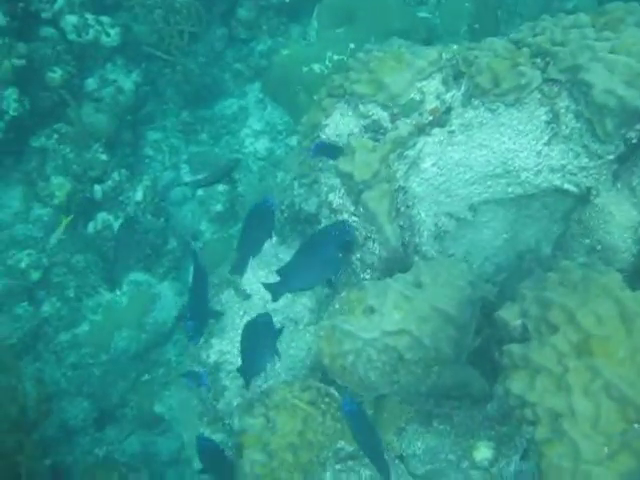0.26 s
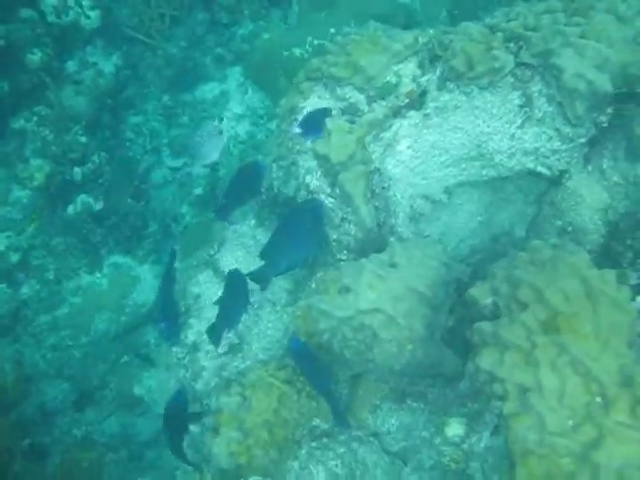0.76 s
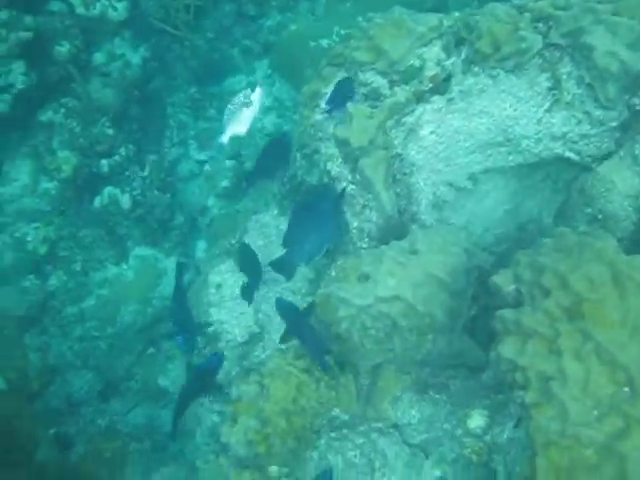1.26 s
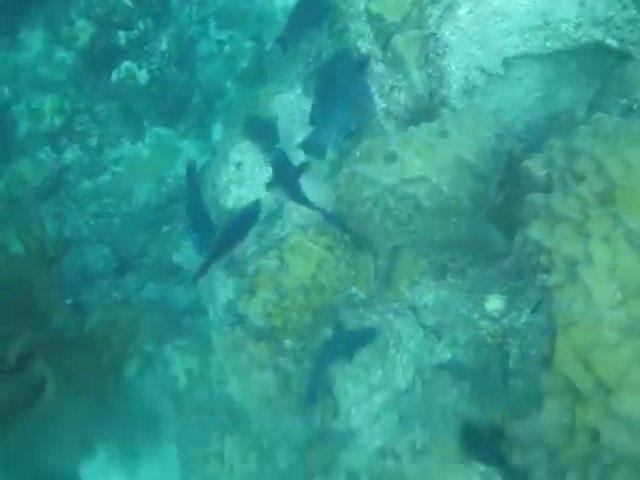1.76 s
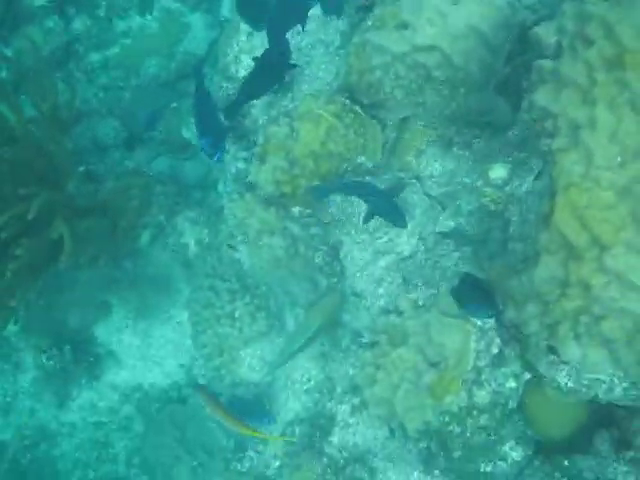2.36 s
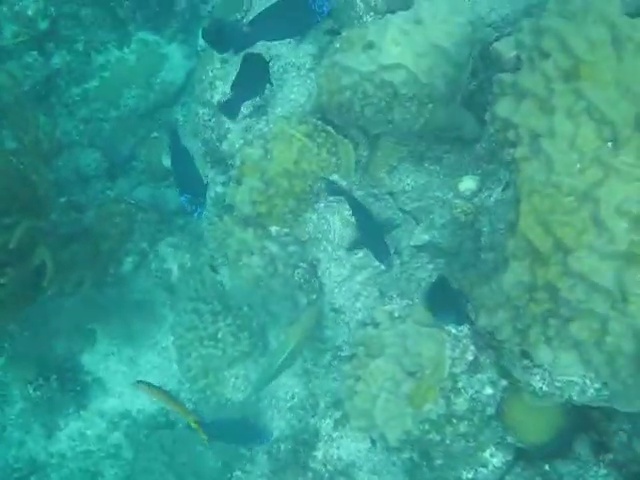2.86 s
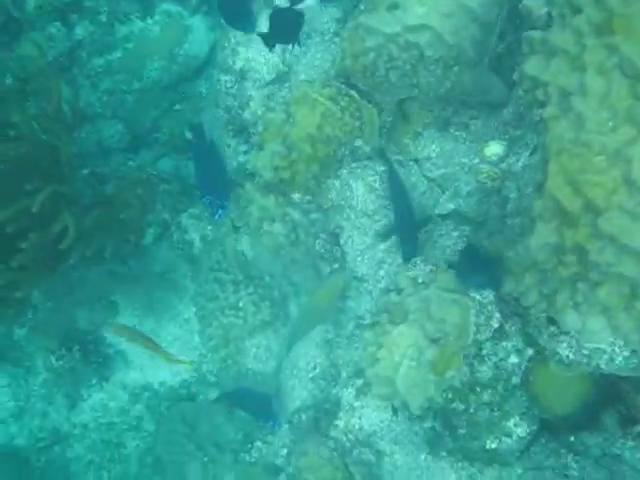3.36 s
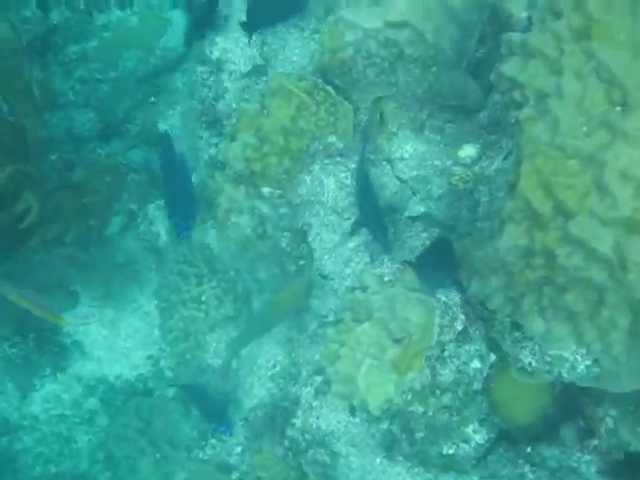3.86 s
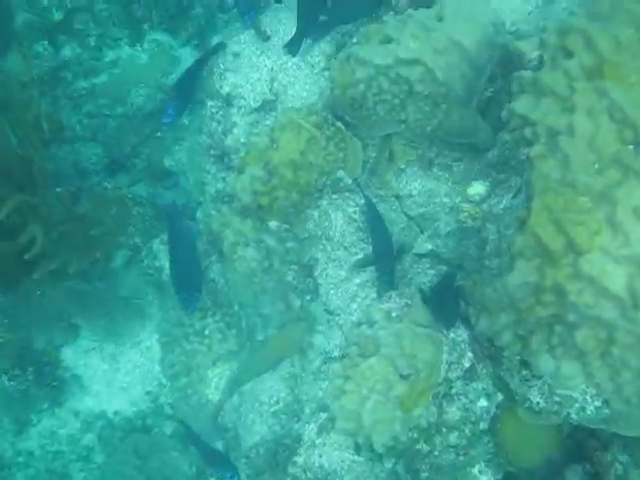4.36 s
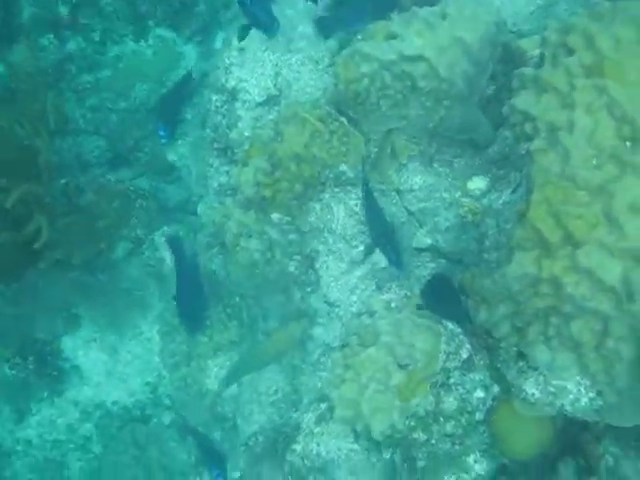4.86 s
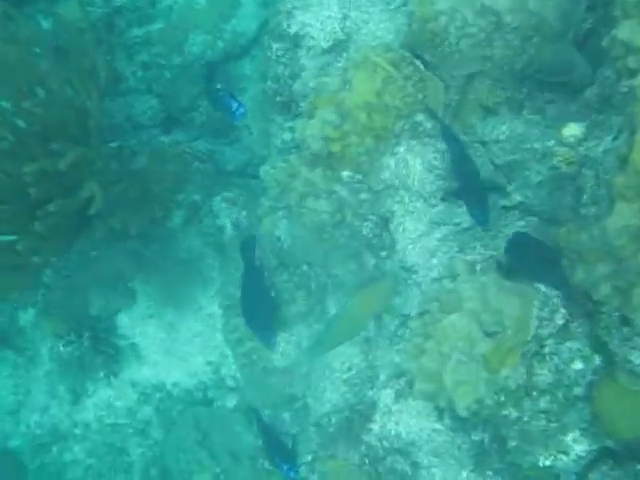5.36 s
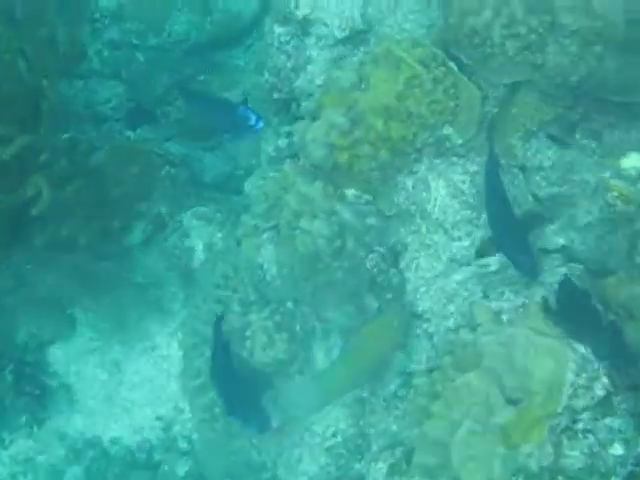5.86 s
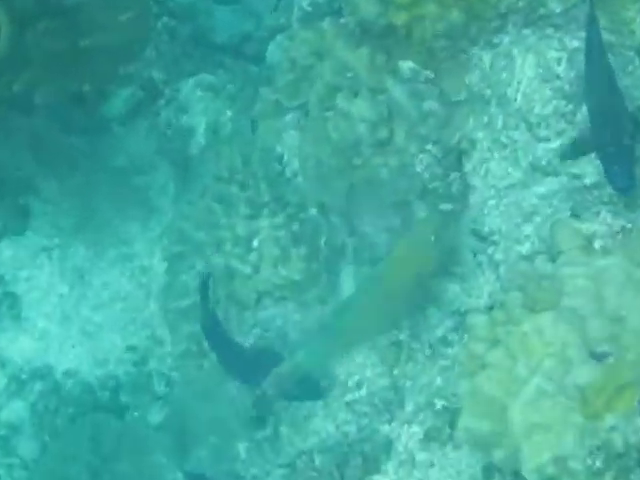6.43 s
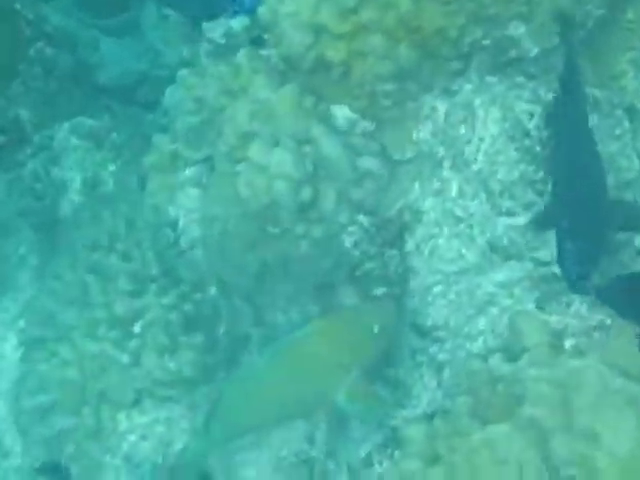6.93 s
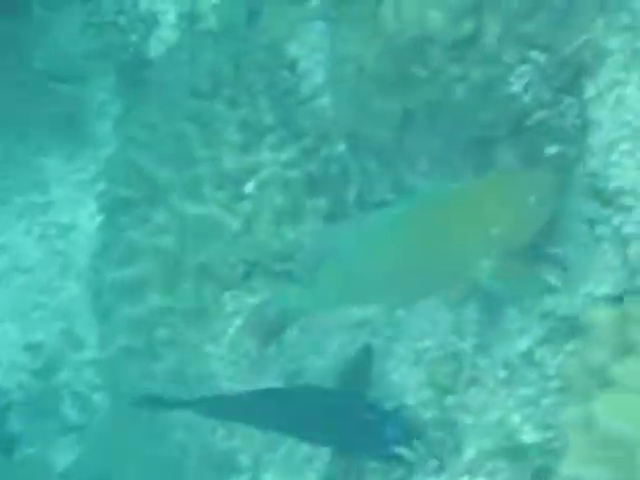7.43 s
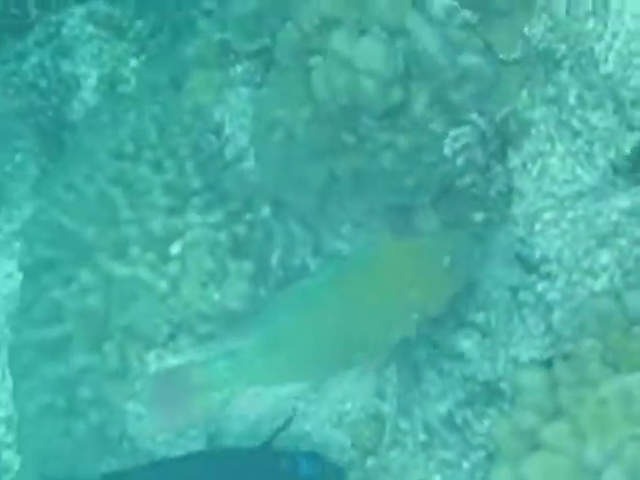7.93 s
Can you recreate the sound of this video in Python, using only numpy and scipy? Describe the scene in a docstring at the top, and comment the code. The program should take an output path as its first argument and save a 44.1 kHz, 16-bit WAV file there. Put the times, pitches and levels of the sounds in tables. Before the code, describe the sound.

A coral reef heard from inside a watertight camera case, slightly hollow and boxy. Throughout, thousands of distant shrimp snaps form a quiet frying hiss with finer crackle, over a low, gently swaying wash and faint bubbles. From the start, nearer snaps tick irregularly, with stronger ones at about 0.7, 1.5 and 3.3 seconds. Grazing fish add very short, dry rasps, notably near 1.7, 3.45 and 5.7. Around 4.4 to 4.9 water swishes and small bubbles fizz; from 4.8 to 5.3 deep, round glugs tumble quickly over a low gurgle, with a strong snap at their onset. Then the crackle, clicks and scrapes carry on. At 7.2 a brief rush of noise leads into one very loud, hard, bright crack with a soft thump at 7.26. The background ducks and recovers within a fraction of a second; a sharp snap follows at 7.7 and a small bubble near 8.2.

```python
"""A frying hiss and crackle of distant shrimp over a low wash: a coral reef inside a diver's camera case.
Near snaps are noise bursts and rasping fish are stick-slip noise, both ringing the watertight case.
Air glugs and fizzes as swelling sines; noise swells as water swishes and briefly leads into a crack.
That one very close crack, made of ringing modes, a thump and a burst, makes the gain control duck."""
import sys
import numpy as np
from scipy import signal
from scipy.fft import rfft, irfft
from scipy.io import wavfile
from scipy.ndimage import uniform_filter1d

SR = 44100
rng = np.random.default_rng(int(sys.argv[2]) if len(sys.argv) > 2 else 0)


def unload_wav(signal):
    """Save mono or channel-first audio to the path in sys.argv[1] as 16-bit WAV at rate SR, clipped to [-1, 1]."""
    wavfile.write(
        sys.argv[1],
        SR,
        np.round(np.clip(np.atleast_2d(signal).T, -1, 1) * 32767).astype(np.int16),
    )


N = 361179
TIME = np.arange(N) / SR


def amp(db):
    """Decibels to gain."""
    return 10 ** (np.asarray(db) / 20)


def evened(x):
    """Scales to rms 1."""
    return x / np.sqrt(np.mean(x ** 2) + 1e-20)


def read(points, hz):
    """Interpolates (Hz, dB) points on a log-frequency axis."""
    f, value = np.transpose(points)
    return np.interp(np.log(hz + 1), np.log(f + 1), value)


def add(mix, start_s, sound):
    """Mixes a sound in at start_s."""
    part = mix[max(round(start_s * SR), 0):][:len(sound)]
    part += sound[:len(part)]


def coloured(x, spectrum):
    """Filters by a spectrum of (Hz, dB) points."""
    hz = np.fft.rfftfreq(len(x), 1 / SR)
    return irfft(rfft(x) * amp(read(spectrum, hz)), len(x))


def causal(log_gain):
    """Causal (minimum-phase) spectrum with this log gain around the full frequency circle."""
    return np.exp(np.conj(signal.hilbert(log_gain)))


def swells(rows, attack_s, release_s):
    """Gain over time of events that rise, hold and fall."""
    gain = np.zeros(N)
    for start_s, length_s, db in rows:
        rise = (TIME - start_s) / attack_s
        fall = (start_s + length_s - TIME) / release_s
        gain += amp(db) * np.clip(np.minimum(rise, fall), 0, 1)
    return gain


# Resonances of the camera case. Each row: centre in Hz, half-power width in Hz, relative level in dB.
CASE_MODES = [(453, 285, 3.5), (876, 460, -7.5), (1412, 206, -3), (2040, 276, -1), (2780, 110, -20),
              (3276, 320, -2), (3630, 300, -7), (4940, 290, -6), (5470, 360, -9), (5847, 190, -5.5),
              (7340, 440, -14.5), (8050, 234, -4.5), (8730, 260, -8), (9180, 360, -9), (10000, 290, -10),
              (10830, 530, -7), (11380, 550, -11), (11970, 400, -11), (13500, 690, -14), (14800, 1200, -14)]


def case_response(leak_db, leak_edge_hz=11500, size=1024):
    """Impulse response of the case: its resonances over a direct leak."""
    hz = abs(np.fft.fftfreq(size, 1 / SR))
    power = amp(leak_db) ** 2 / (1 + (hz / leak_edge_hz) ** 2) ** 2
    for centre_hz, width_hz, db in CASE_MODES:
        power = power + amp(db) ** 2 * 0.5 ** ((2 * (hz - centre_hz) / width_hz) ** 2)
    return np.fft.ifft(causal(np.log(power) / 2)).real


def through_case(force, case, colour_db, db, level_s):
    """Rings the case with a coloured force; total energy equals rms level db held for level_s."""
    hz = np.maximum(abs(np.fft.fftfreq(len(case), 1 / SR)), SR / len(case))
    path = np.fft.ifft(causal(np.log(amp(colour_db(hz)))) * np.fft.fft(case)).real
    rung = signal.fftconvolve(force, path)
    return amp(db) * evened(rung) * np.sqrt(level_s * SR / len(rung))


def collapse(decay_s, echo_db, echo_decay_s, size=900):
    """A cavity collapses: a burst of about a millisecond, then scatter from the rock around."""
    t = np.arange(size) / SR
    burst = np.exp(-(t / decay_s) ** 2)
    scatter = amp(echo_db) * np.exp(-t / echo_decay_s)
    return rng.standard_normal(size) * (burst + scatter)


def bubble(start_hz, swell_s, rise_per_s):
    """A pocket of air swells into ringing and dies away, its pitch rising slightly."""
    t = np.arange(SR // 8) / SR
    age = t / swell_s
    return age * np.exp(1 - age) * np.sin(2 * np.pi * start_hz * t * (1 + rise_per_s * t))


def trickle(low_hz, high_hz, per_s, cycles, count=16):
    """A random stream of bubbles of many sizes; each swells over a set number of cycles."""
    out = np.zeros(N)
    for hz in np.geomspace(low_hz, high_hz, count):
        births = rng.standard_normal(N) * (rng.random(N) < per_s / count / SR)
        out += signal.oaconvolve(births, bubble(hz, cycles / hz, rise_per_s=1))[:N]
    return evened(out)


# Colour of the far crackle, apart from the case. Each row: frequency in Hz, relative level in dB.
FAR_COLOUR = [(300, -6), (1400, 2.5), (2100, -3.5), (2750, 1.5), (3300, -7), (5500, -9), (9000, -7.5),
              (16000, -14.5)]


def far_reef(case, per_s=3000, rms_db=-56):
    """Thousands of distant snaps merge into a frying hiss."""
    clicks = rng.standard_normal(N) * (rng.random(N) < per_s / SR)
    rung = signal.oaconvolve(clicks, case)[:N]
    return amp(rms_db) * evened(coloured(rung, FAR_COLOUR))


# Colour of the nearer crackle before the case. Each row: frequency in Hz, relative level in dB.
NEARER_COLOUR = [(300, -8.5), (1400, -11.5), (2100, -1), (3300, 0), (5300, 1), (8000, 3.5), (11000, 1),
                 (15000, 4)]


def crackle(case, spread_db=3.5, cap_db=15, rms_db=-59.5, tint_db=6, count=1300):
    """Shrimp farther off: random snaps, mostly faint, each tinted by its own path through the rock."""
    out = np.zeros(N)
    hz = abs(np.fft.fftfreq(len(case), 1 / SR))
    knots_hz = np.linspace(0, SR / 2, num=14)
    draws = rng.standard_normal((count, len(knots_hz)))
    tints = np.array([np.interp(hz, knots_hz, row) for row in draws])
    log_gain = np.log(amp(read(NEARER_COLOUR, hz) + tint_db * tints))
    paths = causal(log_gain) * np.fft.fft(case)  # causal: the attack stays sharp
    sizes_db = np.minimum(spread_db * rng.exponential(1, count), cap_db)
    starts_s = rng.random(count) * N / SR
    for start_s, size_db, path in zip(starts_s, sizes_db, paths):
        force = collapse(decay_s=0.00048, echo_db=-1.0, echo_decay_s=0.0036, size=len(case))
        rung = np.fft.ifft(np.fft.fft(force) * path).real
        add(out, start_s, amp(size_db) * evened(rung))
    return amp(rms_db) * evened(out)


# Spectrum of the low wash. Each row: frequency in Hz, relative density in dB per Hz.
WASH_COLOUR = [(15, -13), (25, 1.5), (50, 0.5), (150, 0.5), (280, -2), (450, -11.5), (700, -13.5),
               (1400, -14), (2600, -16.5), (6500, -25.5), (16000, -32.5)]


def water(level_db=-55, sway_rms_db=0.57):
    """Low wash of water around the case, swaying slowly."""
    waves = [np.sin(2 * np.pi * (f * TIME + rng.random())) / np.sqrt(f)
             for f in np.geomspace(0.3, 6, num=12)]
    sway = evened(sum(waves))
    wash = evened(coloured(rng.standard_normal(N), WASH_COLOUR))
    return amp(level_db + sway_rms_db * sway) * wash


def burble(rms_db=-67.5):
    """Faint bubbles all along, born at random over two octaves."""
    return amp(rms_db) * trickle(low_hz=137.6, high_hz=547, per_s=55, cycles=1.24)


# Colour all near snaps share before the case. Each row: frequency in Hz, relative level in dB.
SNAP_COLOUR = [(460, 0.5), (1100, -4.5), (2100, -0.7), (2650, 3), (3400, 1), (4200, 2.7), (5300, -2),
               (6600, -5.5), (7900, -2.5), (11000, 1.8), (14200, 5)]
# Near shrimp snaps. Each row: start in seconds, level in dB (rms over 10 ms), pitch in Hz, spread in octaves.
NEAR_SNAPS = [(0.1313, -43, 5650, 0.66), (0.181, -46.5, 6030, 0.48), (0.273, -47.5, 3850.0, 1.1),
              (0.317, -49.3, 9070.0, 0.9), (0.4427, -47.5, 5500, 0.58), (0.5202, -45, 4970, 0.9),
              (0.621, -49.5, 2610.0, 1.2), (0.7025, -35.5, 6570, 0.39), (1.0653, -43.5, 3520.0, 1.5),
              (1.3508, -41.5, 3570, 1.3), (1.5244, -37.5, 6720.0, 0.41), (1.862, -43, 3750, 0.89),
              (2.3449, -47.5, 4160.0, 1.8), (2.446, -46.5, 4400, 1.1), (2.5003, -48, 11580.0, 0.49),
              (2.559, -48.8, 5600, 0.34), (2.713, -40.5, 4970, 1.31), (2.8305, -46.5, 7250.0, 1.2),
              (2.8688, -43, 10250.0, 1.3), (2.9773, -45, 7490.0, 0.4), (3.122, -48.9, 3100.0, 0.55),
              (3.1525, -48, 3540.0, 1.3), (3.2814, -38.7, 6900.0, 0.42), (3.34, -46.2, 4520.0, 1.8),
              (3.3756, -47.0, 4950.0, 1.7), (3.4147, -42, 8000.0, 1.1), (3.5903, -43, 3000, 0.39),
              (3.61, -50.5, 4890.0, 1.13), (3.8768, -40, 8800, 0.61), (3.9756, -51, 5570, 0.18),
              (4.0828, -50, 5860, 0.91), (4.22, -40, 5010.0, 2.4), (4.2589, -42, 3340.0, 0.45),
              (4.3637, -48, 7280.0, 0.7), (4.52, -45, 5060.0, 1.1), (4.54, -46, 3030.0, 1.27),
              (4.6879, -45.5, 5390.0, 0.84), (4.8183, -33.5, 1720, 1.54), (4.8423, -44.2, 2560.0, 0.89),
              (4.9398, -46, 1960, 2.4), (5.183, -52, 7300, 0.22), (5.2538, -45, 1000.0, 2.4),
              (5.307, -43.5, 4200.0, 0.75), (5.4663, -41, 7200, 0.63), (5.6398, -50.5, 5330.0, 1.02),
              (5.7059, -45.5, 1840.0, 3.0), (6.1068, -44, 9000, 0.39), (6.179, -38.5, 6860, 0.93),
              (6.5293, -46.3, 5940.0, 0.4), (6.5432, -47, 4720.0, 0.74), (6.6706, -45, 5480.0, 3.3),
              (6.853, -47, 4270.0, 0.57), (6.9602, -52, 3980.0, 0.67), (7.1049, -43, 6110.0, 2.1),
              (7.309, -50, 8900, 0.73), (7.3544, -48, 7570.0, 0.71), (7.5767, -48.7, 7550, 0.22),
              (7.714, -32.0, 7560, 1), (8.127, -46, 9200, 0.87)]


def snaps(case, skirt=1.1):
    """Near snaps: each is strongest around a pitch of its own and falls away to both sides."""
    out = np.zeros(N)
    for start_s, db, pitch_hz, octaves in NEAR_SNAPS:
        def colour_db(hz):
            offset = np.log2(hz / pitch_hz) / octaves
            return read(SNAP_COLOUR, hz) - skirt * 20 * np.log10(1 + offset ** 2)
        force = collapse(decay_s=0.001, echo_db=-8.5, echo_decay_s=0.0046)
        add(out, start_s, through_case(force, case, colour_db, db, level_s=0.01))
    return out


# Colour all rasping strokes share before the case. Each row: frequency in Hz, relative level in dB.
RASP_COLOUR = [(150, -6), (460, -1.5), (700, -3.5), (1100, 0), (1450, -5.5), (2100, 2.8), (3400, 1.7),
               (5300, 1.2), (7900, -1.1), (11000, -0.5), (14200, -2)]
# Strokes of grazing fish. Each row: start in seconds, length in seconds, level in dB before the common gain,
# brightness in dB per octave.
STROKES = [(0.745, 0.055, -51, -1.2), (1.488, 0.058, -50, -0.5), (1.675, 0.014, -45.5, 0.5),
           (1.7, 0.024, -48.5, 1.8), (1.734, 0.01, -41, 0.5), (1.987, 0.042, -49, 1.5),
           (2.335, 0.07, -52.5, 2), (2.9, 0.065, -50.5, 0.5), (3.225, 0.03, -48.5, 0.5),
           (3.2575, 0.012, -43, 0), (3.312, 0.072, -53.5, 2.2), (3.451, 0.028, -40.5, 0.1),
           (3.776, 0.045, -48, 0.8), (4.153, 0.029, -49.5, 0.5), (4.196, 0.046, -46.5, 0.3),
           (4.607, 0.013, -44.5, 0), (4.69, 0.025, -53, 0.5), (5.423, 0.024, -50.5, 0.7),
           (5.698, 0.034, -46, -2.2), (5.7263, 0.0079, -37.2, 0), (5.741, 0.0079, -39.5, -0.5),
           (5.751, 0.06, -49.5, 1), (6.41, 0.015, -42.5, -0.7), (6.645, 0.059, -52.5, -1.5),
           (6.811, 0.064, -48.5, 3), (7.096, 0.032, -45, 0), (7.139, 0.016, -47.5, 0.1),
           (7.93, 0.05, -50, 0)]


def scrapes(case, slips_per_s=135, slip_decay_s=0.0016, grit=0.2, uneven_db=2.5,
            knock_hz=470, knock=0.83, gain_db=0.5):
    """Teeth drag over rock, catching and slipping at an uneven pace, with a hollow knock in each slip."""
    out, t = np.zeros(N), np.arange(SR // 8) / SR
    hollow = signal.iirpeak(knock_hz, 3.5, fs=SR)
    for start_s, length_s, db, brightness in STROKES:
        def colour_db(hz):
            return read(RASP_COLOUR, hz) + brightness * np.log2(hz / knock_hz)
        gaps_s = rng.uniform(0.4, 1.6, size=30) / slips_per_s
        slips_s = np.cumsum(gaps_s) - gaps_s[0]
        age_s = t - slips_s[:, None]
        sizes = amp(uneven_db * rng.standard_normal(len(gaps_s)))
        grip = grit + sizes @ (np.exp(-abs(age_s) / slip_decay_s) * (age_s >= 0))
        force = grip * rng.standard_normal(len(t)) * (t <= length_s)
        force = force + knock * signal.lfilter(*hollow, force)
        add(out, start_s, through_case(force, case, colour_db, db, level_s=length_s))
    return amp(gain_db) * out


# Pockets of air that glug. Each row: start in seconds, starting pitch in Hz, peak in dB, swell in seconds.
AIR_POCKETS = [(2.457, 513, -48.5, .003), (4.443, 710, -42.5, 0.0015), (4.817, 137, -29.5, 0.0031),
               (4.845, 112, -42, 0.016), (4.857, 475, -39.5, .0063), (4.911, 160, -33.5, 0.0024),
               (4.93, 152, -27.5, 0.0026), (4.94, 263, -41, .0028), (4.959, 220, -38, 0.0017),
               (4.973, 160, -39, 0.0065), (5.02, 188, -35, 0.0024), (5.047, 175, -39, 0.0044),
               (5.068, 170, -32.5, .0032), (5.082, 180, -33.5, 0.0046), (5.096, 220, -38, .003),
               (5.128, 160, -39, 0.0048), (5.151, 183, -31.5, .0018), (5.255, 313, -35.5, 0.0025),
               (5.258, 566, -45, .0024), (5.262, 250, -42.5, .0085), (7.748, 550, -45, .003),
               (8.175, 468, -40.5, 0.002)]


def glugs():
    """Large bubbles and soft thumps close to the case: swelling sines of slightly rising pitch."""
    out = np.zeros(N)
    for start_s, hz, db, swell_s in AIR_POCKETS:
        add(out, start_s, amp(db) * bubble(hz, swell_s, rise_per_s=0.39))
    return out


# Colour of the noise swells. Each row: frequency in Hz, relative level in dB.
NOISE_SWELL_COLOUR = [(100, 4), (450, -5.5), (1000, -1), (3300, 1.5), (7000, -7.5), (10000, -8.5),
                      (16000, -17)]
# Swells of noise: water swishes, and a short rise of noise leading into the crack.
# Each row: start in seconds, length in seconds, rms level in dB.
NOISE_SWELLS = [(4.38, .085, -49), (4.5, 0.14, -53), (4.68, 0.19, -55.5), (4.84, 0.21, -59.5),
                (7.175, 0.13, -52.5), (7.24, .04, -40.5)]


def noise_swells(case, direct=0.86):
    """Water swishes, and a short rise of noise into the crack: noise partly direct, partly ringing the case."""
    noise = rng.standard_normal(N)
    rung = evened(signal.oaconvolve(noise, case)[:N])
    gain = swells(NOISE_SWELLS, attack_s=0.033, release_s=0.018)
    return gain * evened(coloured(direct * noise + rung, NOISE_SWELL_COLOUR))


SPURT_ATTACK_S, SPURT_RELEASE_S = 0.017, 0.045
# Spurts of small bubbles. Each row: start in seconds, length in seconds, rms level in dB.
SPURTS = [(4.46, .18, -57), (4.675, 0.22, -52)]


def fizz():
    """Spurts of small bubbles, dense and high."""
    gain = swells(SPURTS, SPURT_ATTACK_S, SPURT_RELEASE_S)
    return gain * trickle(low_hz=820, high_hz=1110, per_s=930, cycles=1.9)


# A run of larger bubbles. Each row: start in seconds, length in seconds, rms level in dB.
GURGLES = [(4.66, 0.61, -54.5)]


def gurgle():
    """Larger bubbles rumble under the glugs."""
    gain = swells(GURGLES, SPURT_ATTACK_S, SPURT_RELEASE_S)
    return gain * trickle(low_hz=84, high_hz=209, per_s=200, cycles=0.6)


CRACK_S = 7.2646
# Colour of the crack's burst before the case. Each row: frequency in Hz, relative level in dB.
BURST_COLOUR = [(250, -21.5), (500, -8), (900, -2), (1400, -4.5), (2000, -5), (2500, 6), (3300, -6),
                (5000, 3.5), (6500, -5), (8000, -6), (10000, 6), (12300, 4), (13500, -1), (15500, -3)]


def crack_blow(case, burst_db=-29, thump_hz=127, thump_db=-28, thump_lead_s=0.003):
    """The blow of the loud crack: a soft push of water, then a broad burst between the modes."""
    out = np.zeros(N)
    thump = bubble(thump_hz, swell_s=0.0077, rise_per_s=0.39)
    add(out, CRACK_S - thump_lead_s, amp(thump_db) * thump)
    force = collapse(decay_s=0.0011, echo_db=-15, echo_decay_s=0.0035)
    burst = through_case(force, case, lambda hz: read(BURST_COLOUR, hz), burst_db, level_s=0.049)
    add(out, CRACK_S, burst)
    return out


# Modes the crack rings with. Each row: frequency in Hz, level in dB before the common gain, t60 in seconds.
CRACK_MODES = [(45, -38, .1), (413, -34.5, 0.052), (865, -28.5, 0.028), (1160, -29, 0.018),
               (1570, -22.5, 0.014), (2140, -13.5, 0.016), (2510, -9.5, 0.012), (2720, -51, 0.42),
               (2840, -19.5, 0.018), (3260, -42, 0.14), (3570, -11.5, 0.013), (4980, -17.5, 0.0095),
               (5450, -16.5, .009), (8050, -23.5, 0.011), (9300, -14.5, 0.0093), (10600, -3.5, 0.0054),
               (11620, -6.5, 0.0055), (13260, -16.5, 0.01), (14950, -17, 0.0065)]


def crack_ring(contact_s=0.00063, gain_db=4.0):
    """A hard tick right on the case sets off modes of alternating sign, each with its own decay."""
    out, t = np.zeros(N), np.arange(SR // 2) / SR
    modes = np.zeros(len(t))
    for k, (hz, db, t60_s) in enumerate(CRACK_MODES):
        modes += (-1) ** k * amp(db - 60 * t / t60_s) * np.sin(2 * np.pi * hz * t)
    add(out, CRACK_S, amp(gain_db) * modes * (1 - np.exp(-t / contact_s)))
    return out


def scene():
    """All the sources at the one microphone inside the case."""
    case = case_response(leak_db=-15)
    diffuse = case_response(leak_db=-10)  # sound from all sides evens out the resonances
    background = far_reef(diffuse) + crackle(diffuse) + water() + burble()
    animals = snaps(case) + scrapes(case)
    air_and_noise = glugs() + noise_swells(diffuse) + fizz() + gurgle()
    crack = crack_blow(diffuse) + crack_ring()
    return (background + animals + air_and_noise + crack)[None]


def record(dry, threshold_db=-31, slope=0.53, recover_db_per_s=28, smooth_s=0.044):
    """Gain control ducks late after loud peaks and recovers; the input rounds peaks; then the band limit."""
    power_db = 10 * np.log10(abs(uniform_filter1d(dry[0] ** 2, size=400)) + 1e-12)
    fall_db = TIME * recover_db_per_s
    held_db = np.maximum.accumulate(power_db + fall_db) - fall_db
    over_db = np.maximum(held_db - threshold_db, 0)
    late_db = np.pad(over_db, (220, 0))[:N]  # 5 ms late
    r = np.exp(-1 / (smooth_s * SR))
    ducked = dry / amp(slope * signal.lfilter([1 - r], [1, -r], late_db))
    rounded = 0.7 * np.tanh(ducked / 0.7)
    lowpass = signal.firwin(401, 15900, window=("kaiser", 8), fs=SR)
    return signal.oaconvolve(rounded, lowpass[None], "same")


dry = scene()
out = record(dry)
unload_wav(out)
```